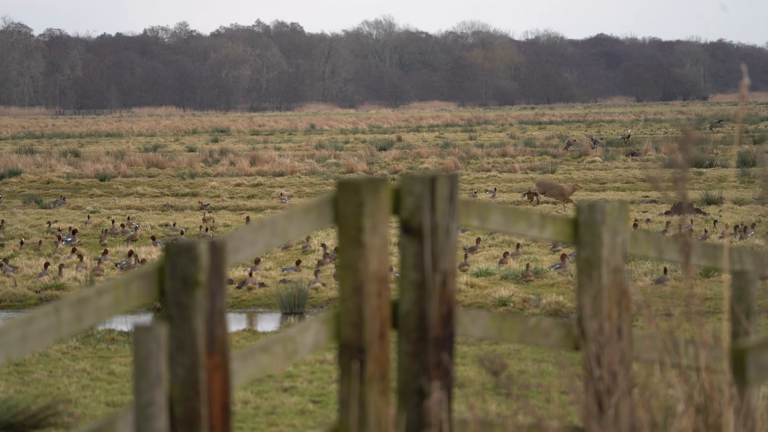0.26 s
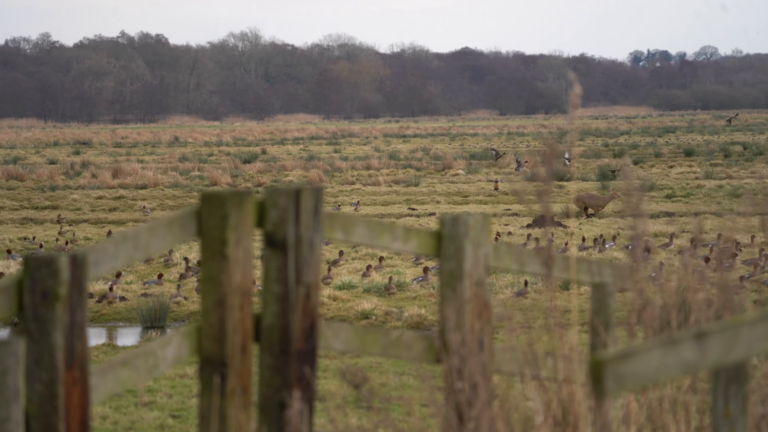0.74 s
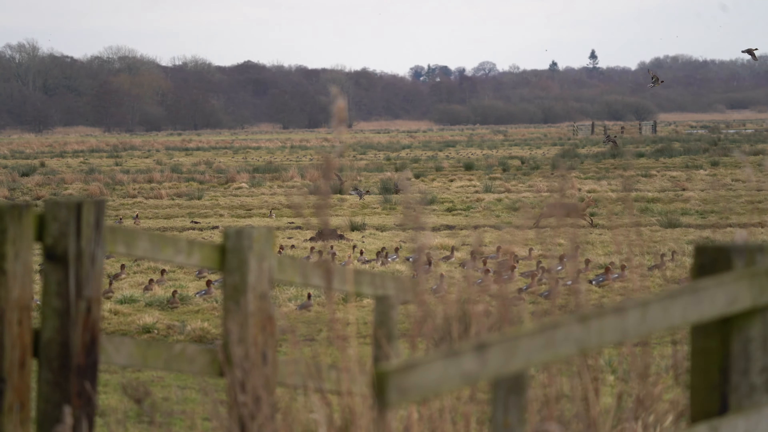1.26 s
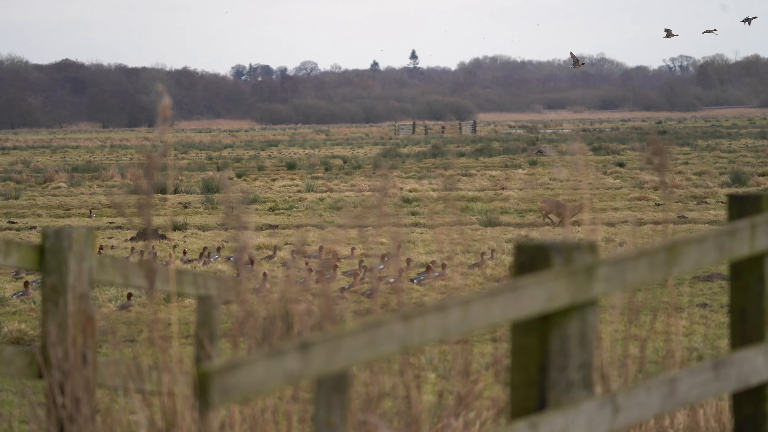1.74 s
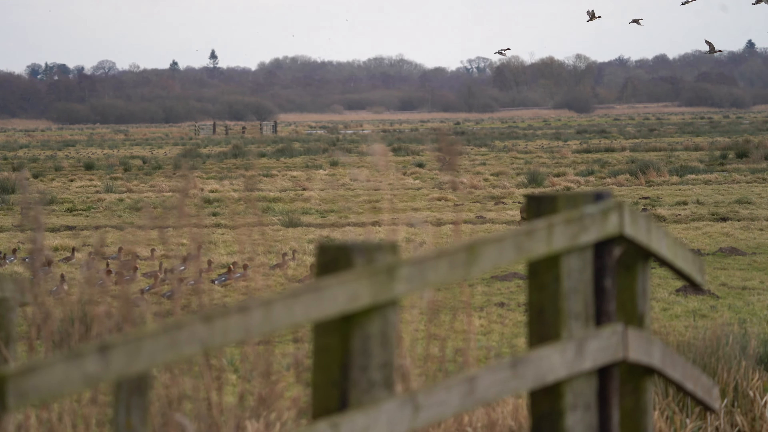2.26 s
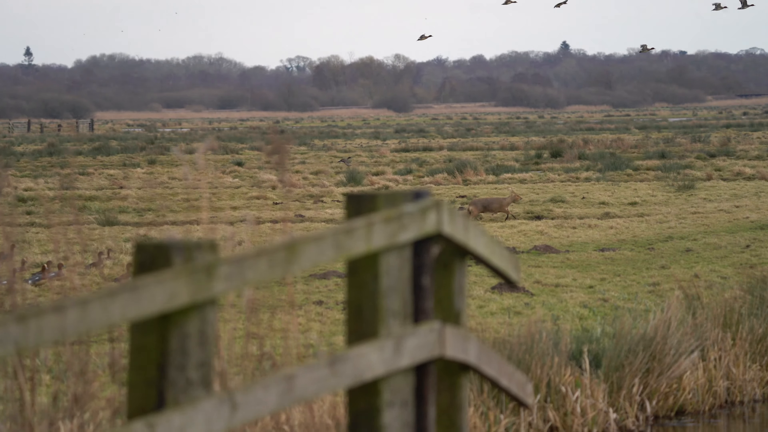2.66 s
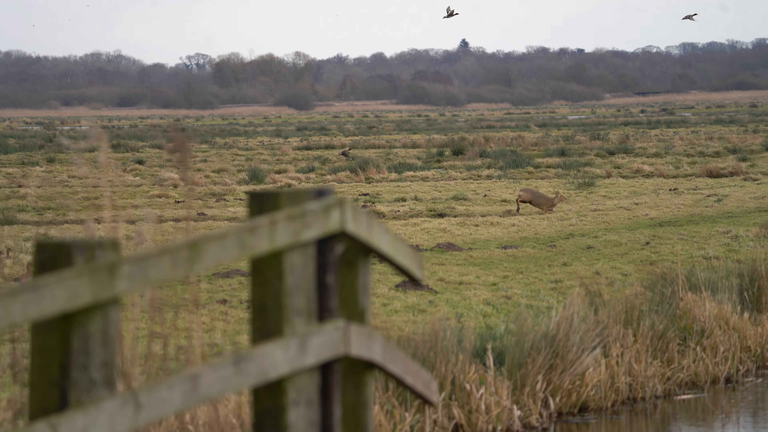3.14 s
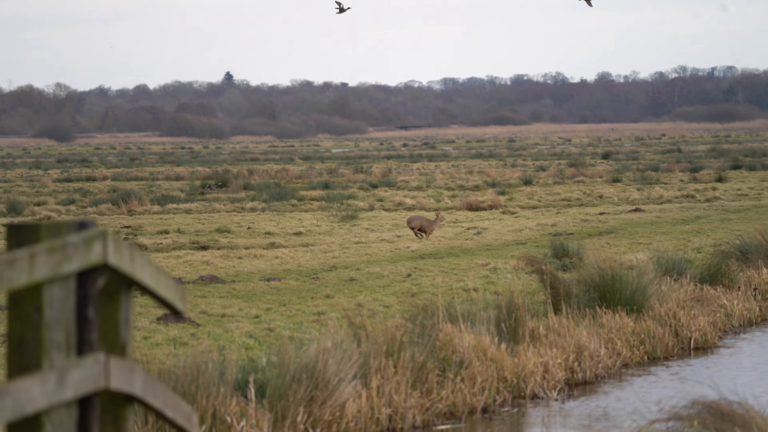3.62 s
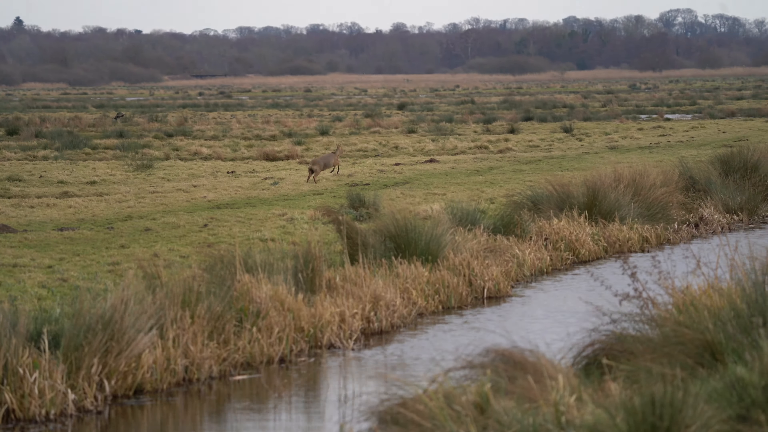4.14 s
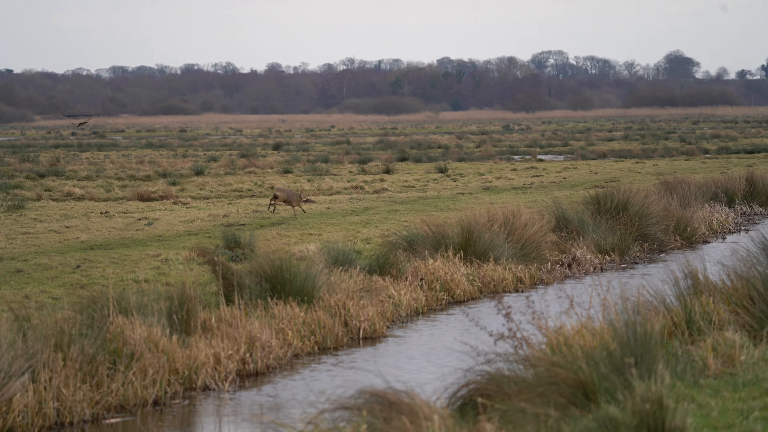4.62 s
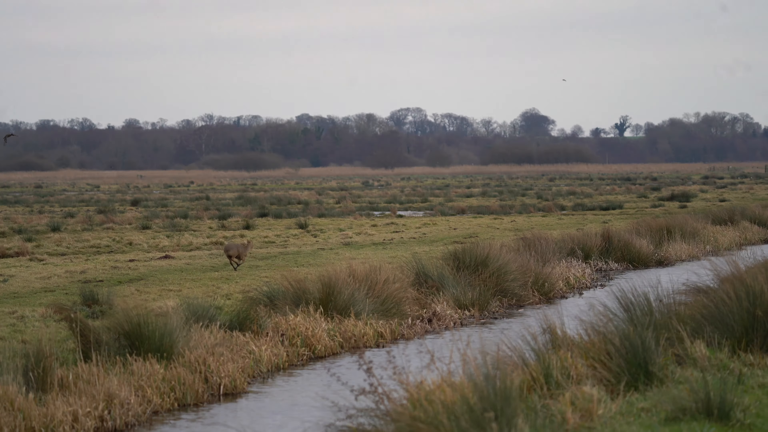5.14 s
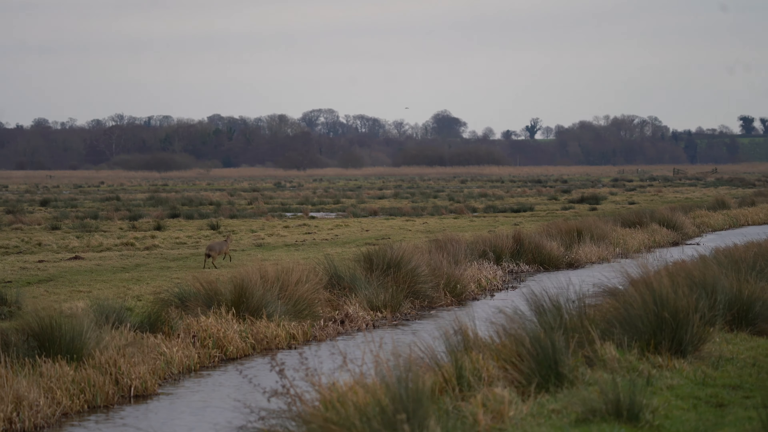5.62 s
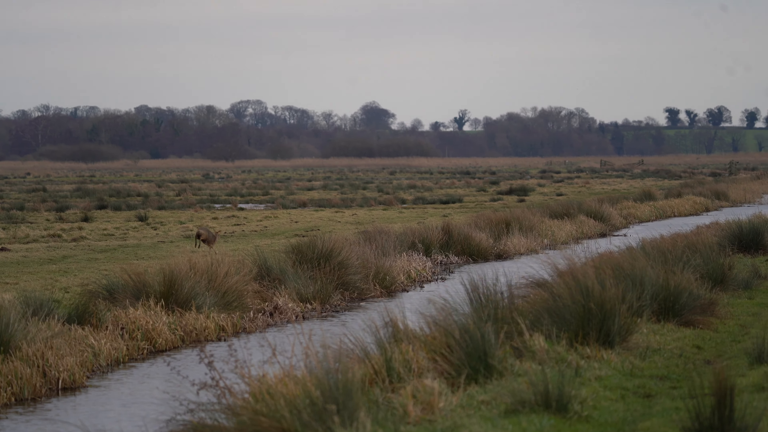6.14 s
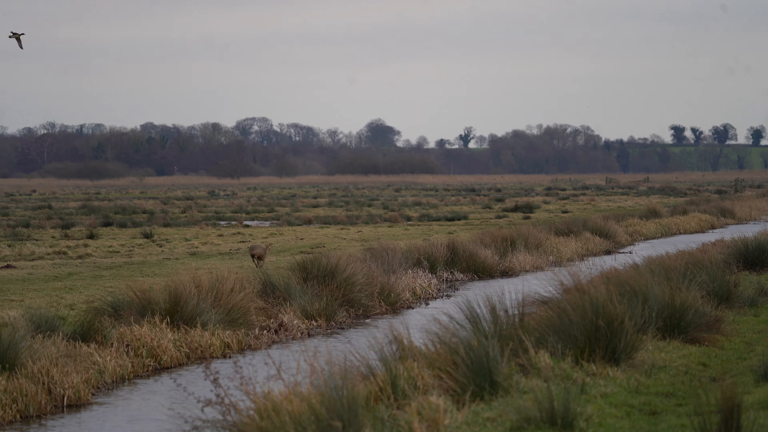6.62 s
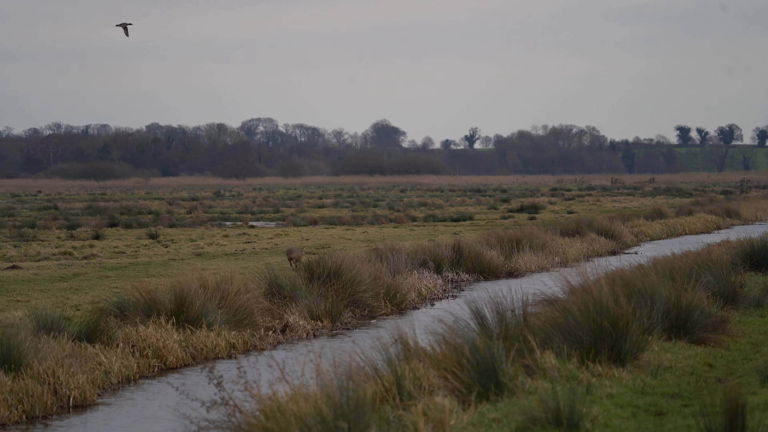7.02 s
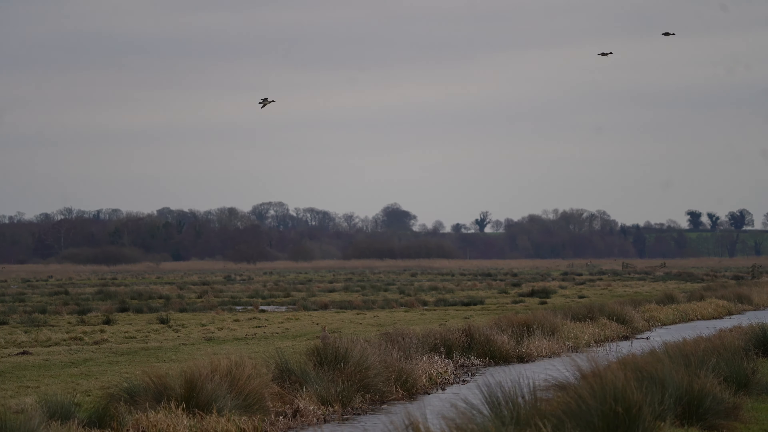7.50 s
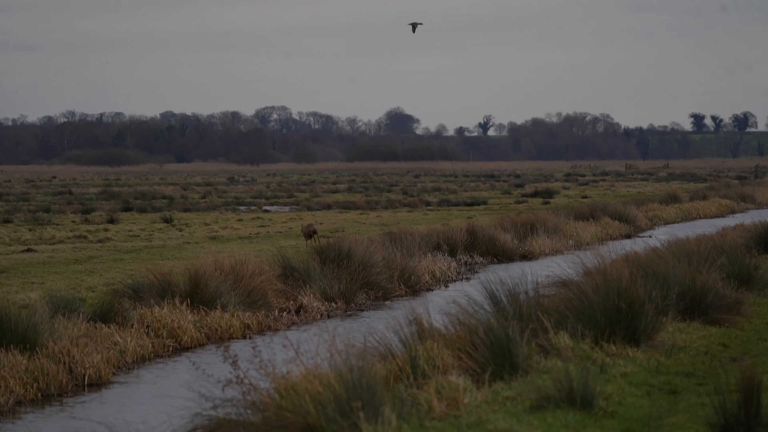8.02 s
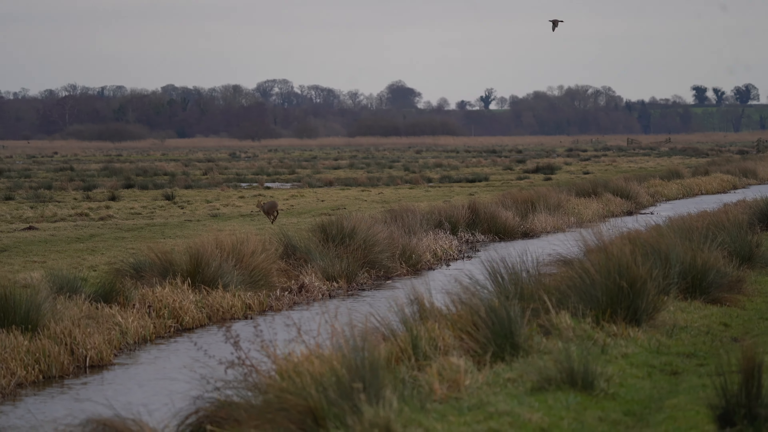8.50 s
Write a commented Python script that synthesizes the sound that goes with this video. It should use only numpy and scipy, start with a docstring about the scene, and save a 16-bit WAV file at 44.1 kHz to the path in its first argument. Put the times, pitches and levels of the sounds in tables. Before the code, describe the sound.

High, pure, falling whistles from many ducks overlap in waves across a wet marsh, heard through a hand-held camera's microphone. Wind rumbles underneath, with soft bumps from the grip and a steady airy hiss. In the second half a stronger gust buffets the microphone while the camera body taps and creaks. The wind eases, the ducks keep calling, and another gust arrives with a few clicks at the close.

```python
"""A low gust of wind, and through it the whistles of wigeon on an open marsh, some near, many far off.
Each whistle is a nearly pure tone that swoops up, sags and breaks to a lower register. Eddies press on
the microphone of a hand-held camera, whose plastic body rings in damped modes as it taps and creaks
in the grip. Distant air and preamplifier hiss lie under everything."""
import sys
import numpy as np
from scipy import signal
from scipy.fft import rfft, irfft
from scipy.io import wavfile
from scipy.ndimage import uniform_filter1d

SR = 44100
rng = np.random.default_rng(int(sys.argv[2]) if len(sys.argv) > 2 else 0)


def file_out(sig):
    """Save sig as 16-bit WAV at sys.argv[1]."""
    # one column per channel
    cols = np.atleast_2d(sig).T
    # limit, then scale
    lim = np.clip(cols, -1, 1)
    pcm = np.round(lim * 32767).astype(np.int16)
    wavfile.write(sys.argv[1], SR, pcm)


N = 386316

# Modes of the camera body: the grip's thud and the shell's knock.
# Each row: frequency in Hz, time to decay by 60 dB in seconds, relative level in dB.
THUD_MODES = [(72.7, 0.74, 2), (219.6, 0.13, 7)]
KNOCK_MODES = [(814, 0.017, 4.5), (1369, 0.017, 6.8), (2040, 0.0076, 1.5), (2640, 0.0081, 3.1)]


def amp(db):
    """Amplitude grows tenfold with every 20 dB."""
    return 10 ** (np.asarray(db) / 20)


def unit_rms(x):
    """Division by the root mean square gives a signal unit power."""
    return x / np.sqrt(np.mean(x ** 2) + 1e-20)


def response_db(curve, hz):
    """A frequency response, interpolated on a logarithmic frequency axis."""
    curve_hz, curve_db = np.transpose(curve)
    return np.interp(np.log(hz + 1), np.log(curve_hz + 1), curve_db)


def add(mix, start_s, sound):
    """Superposition: a sound adds to the mix from its start onward."""
    part = mix[max(round(start_s * SR), 0):][:len(sound)]
    part += sound[:len(part)]


def noise(spectrum):
    """Spectral shaping turns white noise into coloured noise of unit power."""
    white = rfft(rng.standard_normal(N))
    return unit_rms(irfft(white * amp(response_db(spectrum, np.fft.rfftfreq(N, 1 / SR))), N))


def wander(size, span_s):
    """Averaging noise over span_s leaves a smooth random fluctuation, scaled to unit power."""
    span = max(int(span_s * SR), 1)
    return unit_rms(uniform_filter1d(uniform_filter1d(rng.standard_normal(size), span), span))


def ring(modes):
    """Free vibration: after a slightly soft blow, each mode decays exponentially."""
    t = np.arange(SR // 2) / SR
    onset = 1 - np.exp(-t / 0.0007)
    return onset * sum(amp(db - 60 * t / t60) * np.sin(2 * np.pi * hz * t) for hz, t60, db in modes)


def air_and_hiss():
    """Stationary noise: distant air and the preamplifier make a steady broadband floor."""
    # Each row: frequency in Hz, relative spectral density in dB.
    spectrum = [(100, -10), (380, -7), (725, 0), (1100, -3.5), (1800, -5.5), (2600, -8), (4000, -10),
                (15500, -13)]
    return amp(-51) * noise(spectrum)


def wind():
    """Turbulent pressure on the microphone: slow swings rumble, stronger eddies buffet it roughly."""
    # Spectra of the pressure. Each row: frequency in Hz, relative spectral density in dB.
    rumble_spectrum = [(8, -3.5), (18, 9.5), (40, 3.5), (75, -5), (160, -45), (400, -90)]
    buffet_spectrum = [(40, -24), (90, 1), (300, -12.5), (640, -27), (1500, -41), (4000, -96)]
    # Strength of the wind. Each row: time in seconds, rumble level in dB.
    gusts = [(0.0, -30), (0.29, -37.5), (0.56, -44.5), (0.75, -36.5), (0.97, -43), (1.12, -29.5),
             (1.28, -43), (1.83, -39.5), (2.28, -40), (2.85, -45.5), (3.2, -36.5), (3.46, -35.5),
             (3.6, -47.5), (3.82, -38.5), (4.45, -45.5), (5.34, -44.5), (5.55, -24.5), (5.78, -33),
             (6.1, -22), (6.6, -28.5), (7.26, -32.5), (7.69, -42.5), (8.18, -44.5), (8.43, -28.5),
             (8.52, -28), (8.76, -22.5)]
    # Bursting eddies. Each row: time of the peak in seconds, level there in dB, fall in dB per second.
    eddies = [(0.01, -42.5, 84), (1.03, -44.5, 59), (1.84, -48.5, 52), (3.085, -42.5, 69),
              (3.459, -50.5, 80), (5.46, -37, 300), (5.658, -30.5, 300), (5.86, -40, 60), (5.96, -36, 62),
              (6.08, -27.5, 60), (6.6, -33, 64), (6.84, -43, 46), (8.445, -35.5, 200), (8.7, -37.5, 40)]
    buffet_follow, rise_db_per_s = 0.46, 227
    t = np.arange(N) / SR
    rumble_db = np.interp(t, *np.transpose(gusts))
    buffet_power = amp(-53.5 + buffet_follow * (rumble_db + 40)) ** 2
    for peak_s, db, fall_db_per_s in eddies:
        below_peak_db = np.maximum(rise_db_per_s * (peak_s - t), fall_db_per_s * (t - peak_s))
        buffet_power += amp(db - below_peak_db) ** 2
    turbulence = wander(N, 0.014)
    rumble = amp(rumble_db) * unit_rms(noise(rumble_spectrum) * amp(1.2 * turbulence))
    buffet = np.sqrt(buffet_power) * unit_rms(noise(buffet_spectrum) * amp(3.07 * turbulence))
    return rumble + buffet


def camera_taps():
    """Impact excitation: a brief, rough contact rings the shell while the grip thuds."""
    # Blows on the body. Each row: start in seconds, knock gain in dB, thud gain in dB, tick gain in dB.
    taps = [(0.2578, -46, -63, -60), (1.323, -47, -47.5, -57), (2.665, -48, -47.5, -49),
            (3.5436, -41, -49.5, -52), (3.5672, -42, -66, -52), (3.8572, -38, -70, -55),
            (4.9017, -43, -44.5, -47), (5.439, -50, -66, -54), (5.468, -37.5, -42, -34.5),
            (6.117, -32.5, -52, -49), (6.167, -34, -37.5, -61), (6.2876, -36.5, -39, -33),
            (6.8324, -46.5, -47, -60), (7.721, -39.5, -38.5, -57), (7.7427, -34, -41, -56),
            (7.759, -37, -39.5, -48), (8.4799, -38, -45, -58), (8.526, -45, -47, -56),
            (8.595, -44, -46, -51), (8.6145, -44, -45, -51), (8.650, -42, -41.5, -36),
            (8.657, -45, -58, -38)]
    # Modes of the bright tick. Each row: frequency in Hz, 60 dB decay in seconds, relative level in dB.
    tick_modes = [(2040, 0.0036, 19.3), (3900, 0.0015, 24.4), (5740, 0.0021, 24)]
    out = np.zeros(N)
    t = np.arange(SR // 100) / SR
    for start_s, knock_db, thud_db, tick_db in taps:
        contact = rng.standard_normal(len(t)) * amp(-60 * t / 0.01)
        for gain_db, modes in (knock_db, KNOCK_MODES), (tick_db, tick_modes):
            # the grip lands differently each time, so the modes share the blow unevenly
            uneven_modes = [(hz, t60, db + 2.45 * rng.standard_normal()) for hz, t60, db in modes]
            ringing = ring(uneven_modes)[:SR // 20]
            blow = np.convolve(ringing, contact)
            add(out, start_s, amp(gain_db) * blow * abs(ringing).max() / abs(blow).max())
        add(out, start_s, amp(thud_db) * ring(THUD_MODES))
    return out


def grip_shifts():
    """Soft excitation: a shift of the grip rings only the low modes, without a knock."""
    # Each row: start in seconds, peak level in dB.
    shifts = [(1.28, -43), (1.432, -45), (1.49, -38), (1.803, -40.5), (2.258, -41), (2.326, -45),
              (2.806, -42), (3.008, -41.5), (3.309, -41), (3.449, -37), (3.907, -45), (4.676, -36.5),
              (4.779, -39), (5.28, -36)]
    out = np.zeros(N)
    thud = ring(THUD_MODES)
    for start_s, db in shifts:
        add(out, start_s, amp(db) * thud / abs(thud).max())
    return out


def shell_creaks():
    """Stick-slip friction: dense, uneven slips in the grip ring all but the lowest knock mode."""
    # Each row: start of the creak, time it swells toward and time it cuts off, all in seconds;
    # level it swells toward in dB.
    creaks = [(3.793, 3.857, 3.9, -52), (5.72, 5.883, 5.86, -51), (5.995, 6.045, 6.4, -45),
              (6.088, 6.168, 6.215, -40)]
    t = np.arange(N) / SR
    envelope = np.zeros(N)
    for start_s, toward_s, cutoff_s, db in creaks:
        swell_db = np.interp(t, [start_s, toward_s, cutoff_s], [-5.5, 0, -5.5])
        envelope += amp(db + swell_db) * (t > start_s) * (t < cutoff_s)
    slips_per_s = 1800
    slips = rng.standard_normal(N) * (rng.random(N) < slips_per_s / SR)
    slips *= amp(1.7 * wander(N, 0.0016))
    return envelope * unit_rms(signal.oaconvolve(slips, ring(KNOCK_MODES[1:]))[:N])


def marsh_scatter(calls):
    """Scattering from reeds and fence posts leaves a short blur after every call."""
    t = np.arange(SR // 10) / SR
    echoes = rng.standard_normal(len(t)) * amp(-60 * t / 0.095)
    return amp(-9.5) * signal.oaconvolve(calls, echoes / np.linalg.norm(echoes))[:N]


def register_break(hz):
    """At a change of register the pitch drops by a fifth of its height above 1200 Hz."""
    return hz - .2 * (hz - 1200)


def whistle(crest_s, sag_s, tail_s, crest_hz, break_hz, end_hz, level_db, overtone_db):
    """A gliding tone with two harmonics swoops up, sags, breaks and slides out; gives start and sound."""
    # Weighting of the fundamental, which the bill radiates weakly at low pitch, and of the second
    # harmonic. Each row: frequency of that harmonic in Hz, gain in dB.
    bill_radiation = [(1500, -12), (2000, -7), (2400, 0), (2800, 0), (3600, -0.5)]
    overtone_colour = [(3000, 4), (4050, 9), (4800, 0), (6200, -3), (7600, 8.5)]
    swoop_s = min(.058, .022 + .35 * (sag_s + tail_s))
    # a call that breaks high and ends low breaks once more, into a softer last slide
    slide_s = 0.068 if break_hz > 2900 and end_hz < 2700 else 0
    slide_hz_per_s, slide_db = 5000, -4
    t = np.arange(-swoop_s, sag_s + tail_s + slide_s, 1 / SR)  # zero at the crest
    past_tail = t - sag_s - tail_s

    lower_hz = register_break(break_hz)
    step_hz = 0.6014 * (break_hz - lower_hz)  # the swoop steps up across the same break
    rise = np.sqrt(1 - np.clip(-t / swoop_s, 0, 1) ** 2)
    below_crest_hz = (crest_hz / 2 - step_hz) * (1 - rise) + step_hz * (t < -.4 * swoop_s)
    sag = np.clip(t / sag_s, 0, 1) ** 1.4
    head_hz = crest_hz - below_crest_hz + (break_hz - crest_hz) * sag
    tail_hz = lower_hz + (end_hz - lower_hz) * (t - sag_s) / tail_s
    slide_hz = register_break(end_hz) - slide_hz_per_s * past_tail
    hz = np.select([t < sag_s, past_tail < 0], [head_hz, tail_hz], slide_hz)
    hz = uniform_filter1d(hz, 260, mode="nearest")  # each jump takes about 6 ms
    hz *= 1 + 0.00783 * wander(len(t), 0.0037)  # slight pitch jitter

    flutter_db = 2.68 * wander(len(t), 0.018)  # from turbulent air over the marsh
    attack, release = (t - t[0]) / 0.0037, (t[-1] - t) / 0.018
    fade = np.minimum(np.minimum(attack, release), 1)
    phase = 2 * np.pi * np.cumsum(hz) / SR
    tone = amp(response_db(bill_radiation, hz) + slide_db * (past_tail > 0)) * np.sin(phase)
    tone += amp(overtone_db + response_db(overtone_colour, 2 * hz)) * np.sin(2 * phase)
    return crest_s - swoop_s, np.sqrt(2) * amp(level_db + flutter_db) * fade * tone


def flock():
    """Many sources superpose: faint far calls cluster around the near ones, so they come in waves."""
    # Each row: time of the crest, length of the sag and length of the tail in seconds; pitch at the
    # crest, before the break and at the tail's end in Hz; level and relative level of the second
    # harmonic in dB, both before weighting.
    near_calls = [(0.198, 0.06, 0.098, 3420, 3270, 2490, -55, -21),
                  (0.43, 0.065, 0.01, 3230, 3140, 2800, -50, -25),
                  (0.461, 0.13, 0.045, 2990, 2575, 2010, -47.5, -20),
                  (0.497, 0.016, 0.05, 2670, 2490, 1780, -45, -25),
                  (0.578, 0.074, 0.06, 3464, 3260, 2500, -46, -28),
                  (0.73, 0.043, 0.076, 3260, 3150, 2550, -50.5, -19),
                  (0.907, 0.051, 0.01, 3520, 3380, 2900, -59, -20),
                  (0.933, 0.066, 0.058, 2860, 2630, 1930, -52, -26),
                  (1.18, 0.088, 0.051, 2796, 2410, 1720, -53, -19.5),
                  (1.393, 0.045, 0.071, 3576, 3510, 2620, -51, -23),
                  (1.409, 0.01, 0.028, 2530, 2420, 1700, -51, -26),
                  (1.622, 0.025, 0.034, 2780, 2370, 1710, -48, -30),
                  (1.679, 0.011, 0.044, 2850, 2690, 1850, -52, -34),
                  (1.785, 0.078, 0.067, 2970, 2500, 1720, -56.5, -24),
                  (1.849, 0.09, 0.008, 3345, 3040, 2750, -52.5, -28),
                  (2.0, 0.076, 0.097, 3415, 3266, 2393, -50.5, -15.5),
                  (2.389, 0.022, 0.025, 2340, 2200, 1850, -46, -19.5),
                  (2.391, 0.11, 0.099, 2770, 2424, 1670, -52.5, -20),
                  (2.527, 0.077, 0.08, 3464, 3250, 2380, -44, -24),
                  (2.738, 0.036, 0.16, 3550, 3420, 2340, -51.5, -20),
                  (2.83, 0.04, 0.068, 2650, 2460, 1900, -52.5, -21),
                  (2.895, 0.03, 0.125, 3365, 3320, 2450, -54.5, -25),
                  (2.979, 0.12, 0.04, 2900, 2500, 1950, -63, -9),
                  (3.17, 0.057, 0.09, 2870, 2650, 1960, -63, -5),
                  (3.235, 0.072, 0.054, 3480, 3250, 2740, -63, -25),
                  (3.331, 0.045, 0.1, 3540, 3320, 2450, -58, -22),
                  (3.38, 0.047, 0.1, 2730, 2520, 1760, -47, -19.5),
                  (3.717, 0.13, 0.055, 3050, 2780, 2320, -58.5, -20),
                  (3.868, 0.081, 0.069, 2940, 2660, 1970, -62, -9.5),
                  (4.041, 0.043, 0.07, 3320, 3200, 2500, -55.5, -28),
                  (4.152, 0.051, 0.072, 3320, 3198, 2480, -50.5, -25),
                  (4.213, 0.034, 0.085, 3360, 3280, 2460, -55, -17),
                  (4.371, 0.12, 0.06, 2950, 2410, 1740, -44, -13),
                  (4.715, 0.11, 0.0594, 3140, 2510, 1935, -45, -27),
                  (4.975, 0.07, 0.028, 3040, 2570, 2200, -60, -26),
                  (5.065, 0.055, 0.06, 3480, 3280, 2400, -63, -26),
                  (5.282, 0.082, 0.053, 3874, 3394, 2500, -49.5, -20),
                  (5.464, 0.069, 0.105, 3285, 3200, 2397, -55.5, -27),
                  (5.53, 0.07, 0.05, 2837, 2515, 1910, -55.5, -16),
                  (6.008, 0.023, 0.041, 3020, 2480, 1830, -47.5, -24),
                  (6.269, 0.021, 0.076, 3200, 3025, 2470, -60, -20),
                  (6.65, 0.1, 0.01, 3330, 3144, 2790, -57.5, -26),
                  (6.802, 0.02, 0.017, 2770, 2590, 1410, -41.5, -24),
                  (6.83, 0.083, 0.05, 2720, 2440, 2000, -57, -18),
                  (7.0, 0.089, 0.03, 2890, 2582, 2060, -49.5, -25),
                  (7.025, 0.07, 0.05, 3475, 3300, 2570, -55, -26),
                  (7.135, 0.045, 0.012, 3490, 3200, 2750, -56, -26),
                  (7.466, 0.011, 0.042, 2750, 2600, 2000, -48.5, -33),
                  (7.526, 0.024, 0.089, 3554, 3380, 2590, -47.5, -28),
                  (7.754, 0.056, 0.075, 3496, 3280, 2520, -59, -26),
                  (8.115, 0.015, 0.01, 2740, 2700, 2480, -57, -28),
                  (8.17, 0.058, 0.058, 3030, 2890, 2430, -55.5, -27.5),
                  (8.325, 0.05, 0.067, 2850, 2480, 1980, -52, -22),
                  (8.408, 0.021, 0.073, 3390, 3320, 2470, -49.5, -22)]
    far_calls_per_s = 26
    out = np.zeros(N)
    for call in near_calls:
        add(out, *whistle(*call))
    far_calls = rng.random((int(far_calls_per_s * N / SR), 6))
    for neighbour, offset, length, pitch, drop, distance in far_calls:
        crest_s = near_calls[int(neighbour * len(near_calls))][0] + .9 * offset - .45
        sag_s, tail_s = .015 + .08 * length, 0.0213 + 0.079 * drop
        crest_hz = 2400 + 1200 * pitch
        break_hz, end_hz = .92 * crest_hz, (.76 - .12 * drop) * crest_hz
        add(out, *whistle(crest_s, sag_s, tail_s, crest_hz, break_hz, end_hz,
                          level_db=-62 - 9 * distance, overtone_db=-17.5))
    return out


def scene():
    """All sources add linearly in one channel."""
    calls = flock()
    marsh = calls + marsh_scatter(calls) + wind()
    handling = camera_taps() + grip_shifts() + shell_creaks()
    return (marsh + handling + air_and_hiss())[None]


def record(dry):
    """Band limiting: a steep linear-phase low-pass filter removes the highest treble."""
    cutoff_hz = 15700
    lowpass = signal.firwin(2047, cutoff_hz, window=("kaiser", 9), fs=SR)
    padded = np.pad(dry, ((0, 0), (1023, 1023)), "reflect")
    return signal.oaconvolve(padded, lowpass[None], "valid")


dry = scene()
out = record(dry)
file_out(out)
```